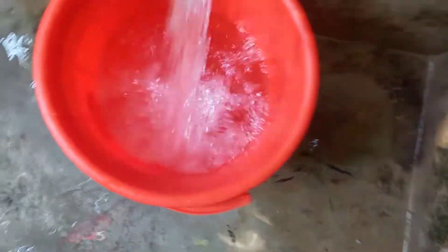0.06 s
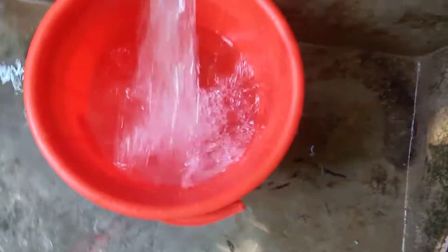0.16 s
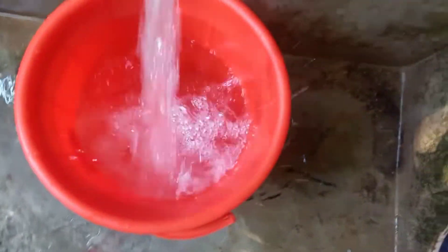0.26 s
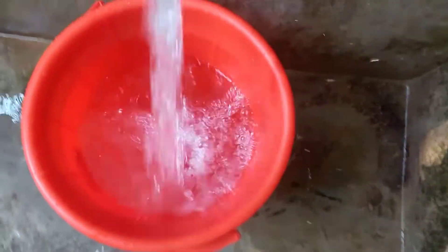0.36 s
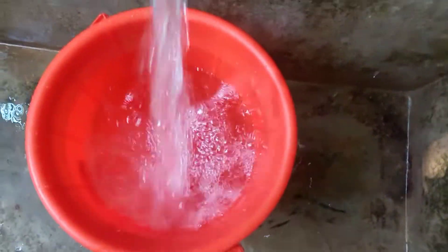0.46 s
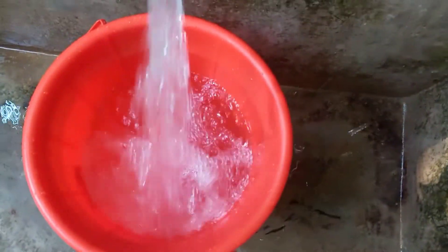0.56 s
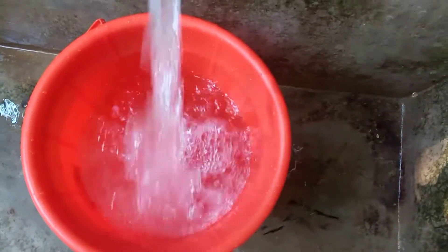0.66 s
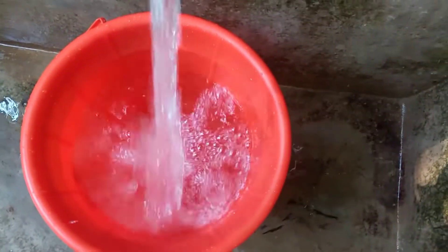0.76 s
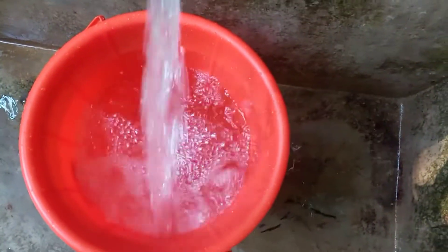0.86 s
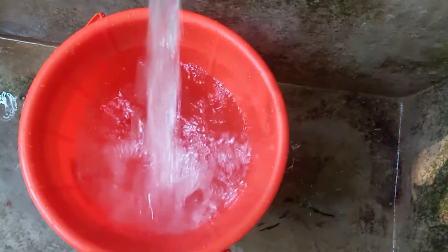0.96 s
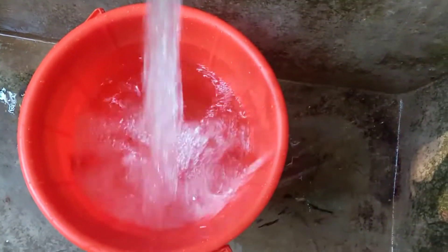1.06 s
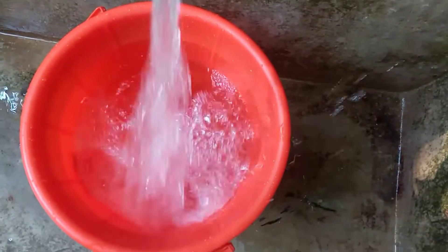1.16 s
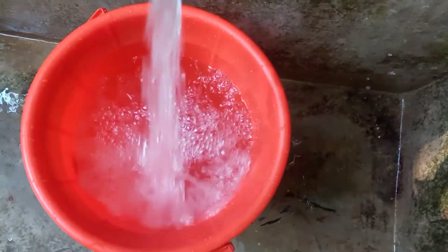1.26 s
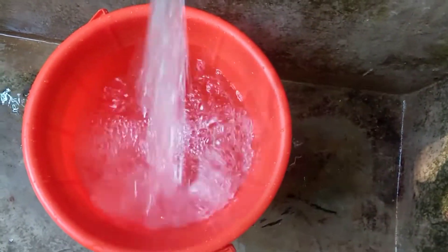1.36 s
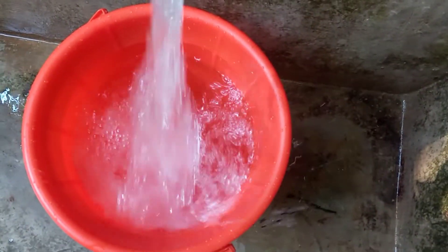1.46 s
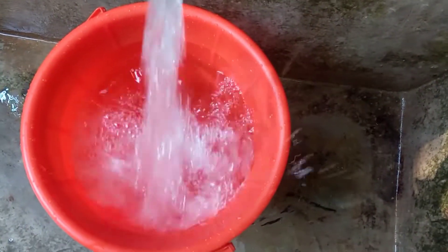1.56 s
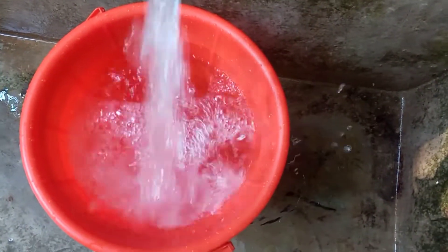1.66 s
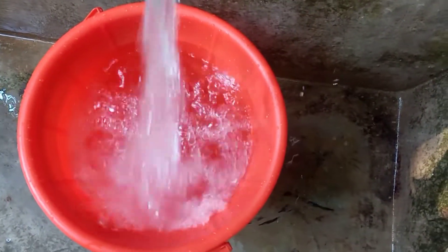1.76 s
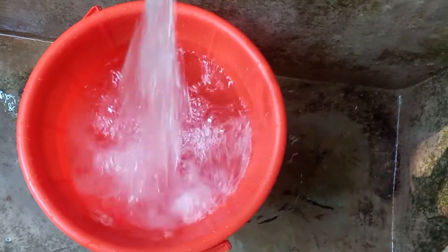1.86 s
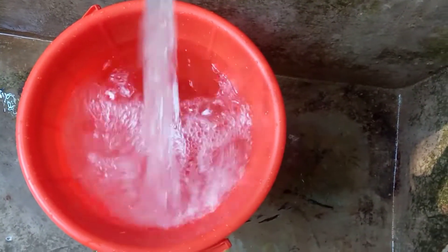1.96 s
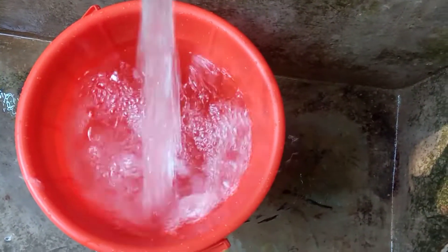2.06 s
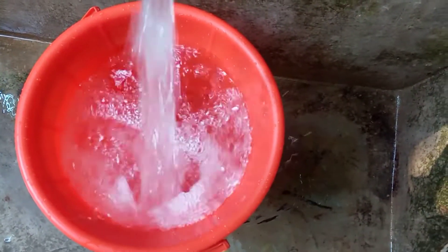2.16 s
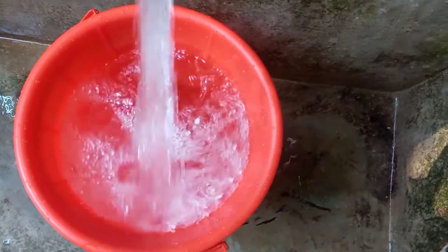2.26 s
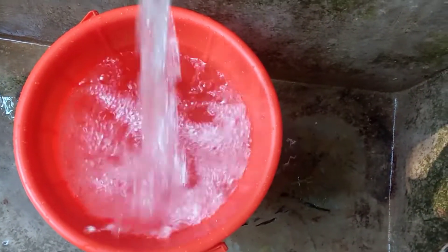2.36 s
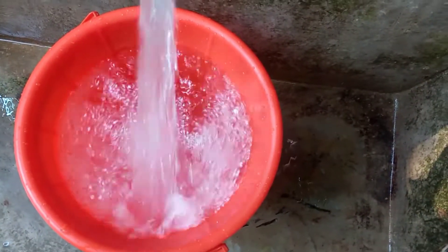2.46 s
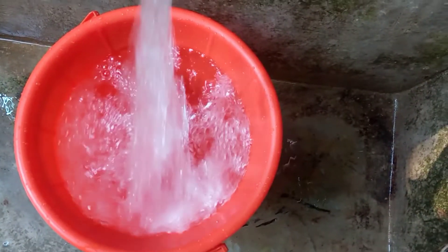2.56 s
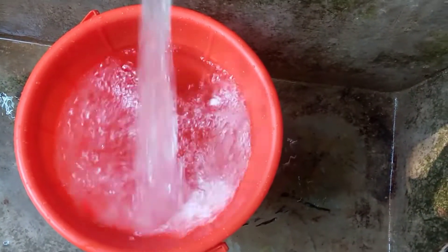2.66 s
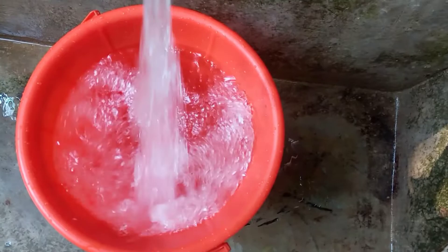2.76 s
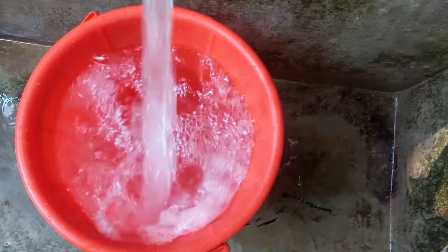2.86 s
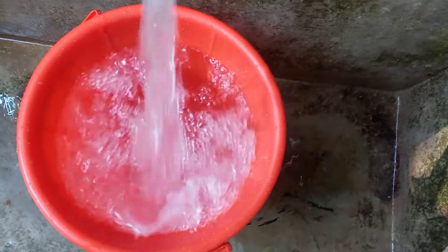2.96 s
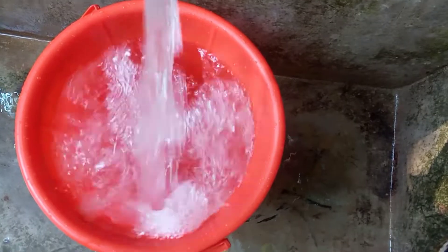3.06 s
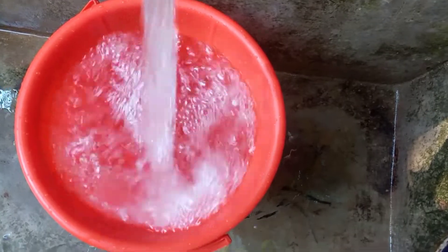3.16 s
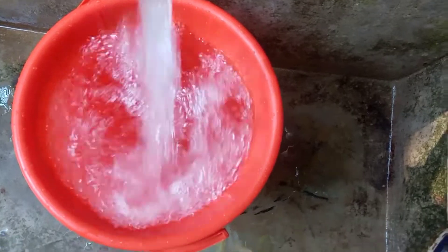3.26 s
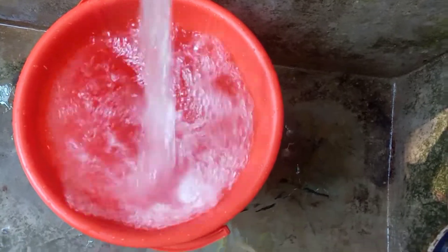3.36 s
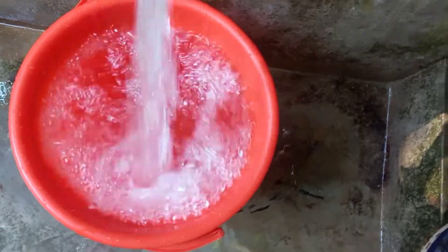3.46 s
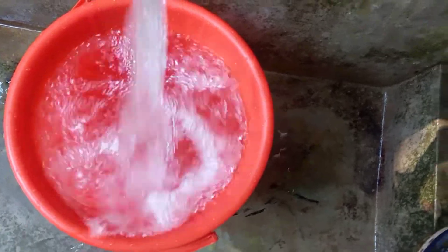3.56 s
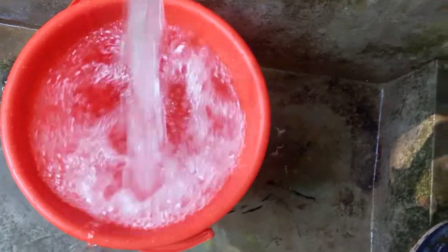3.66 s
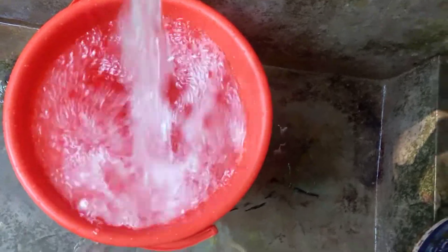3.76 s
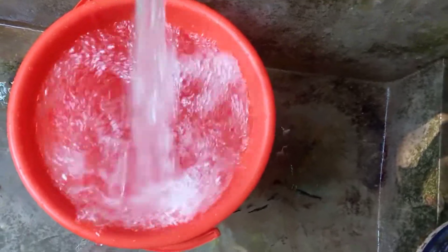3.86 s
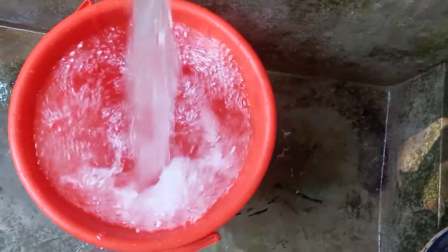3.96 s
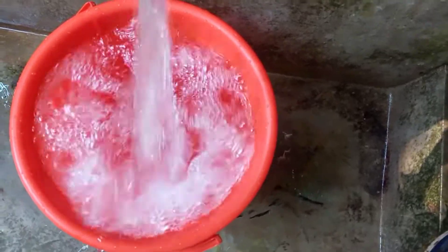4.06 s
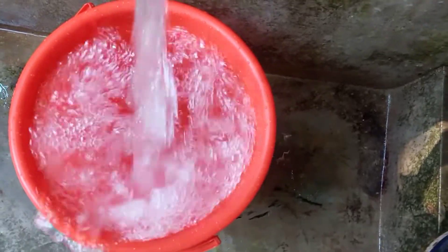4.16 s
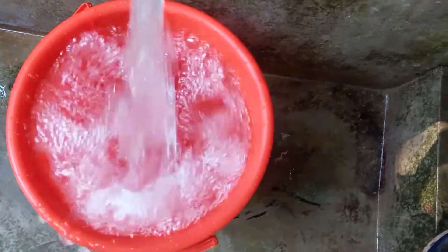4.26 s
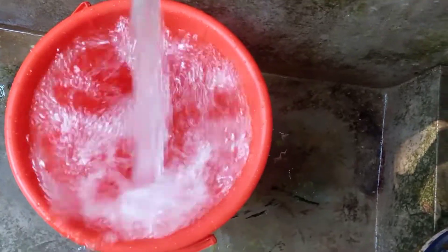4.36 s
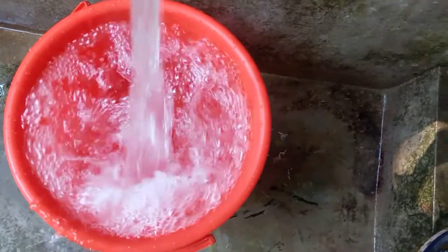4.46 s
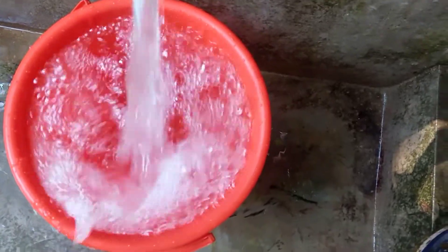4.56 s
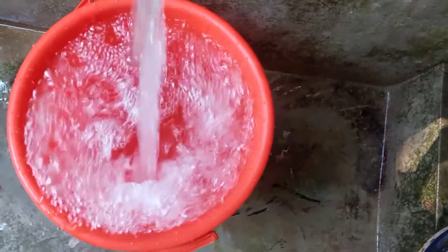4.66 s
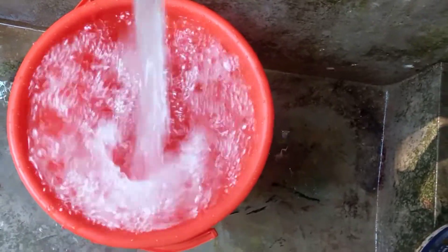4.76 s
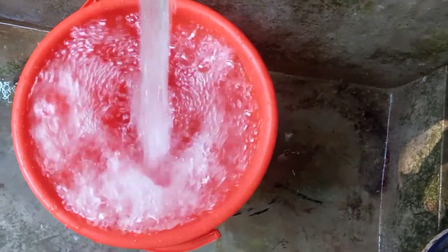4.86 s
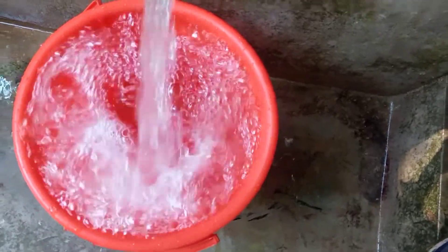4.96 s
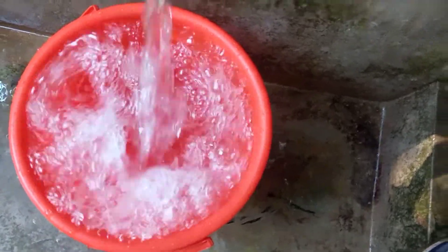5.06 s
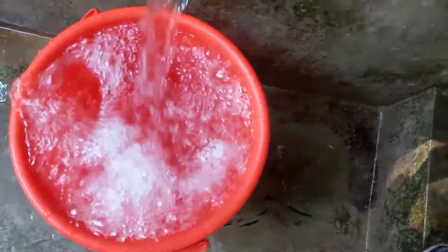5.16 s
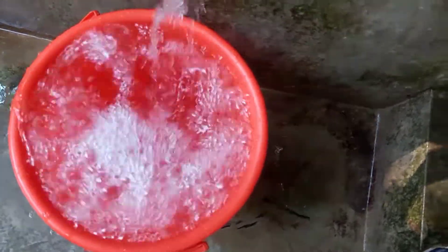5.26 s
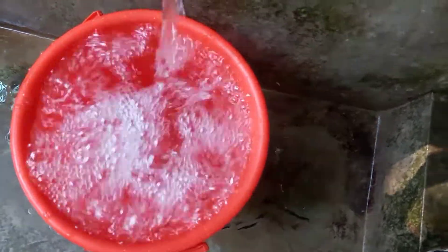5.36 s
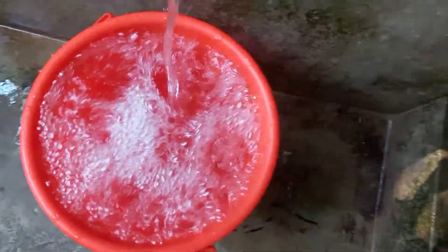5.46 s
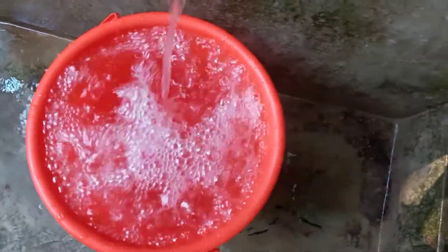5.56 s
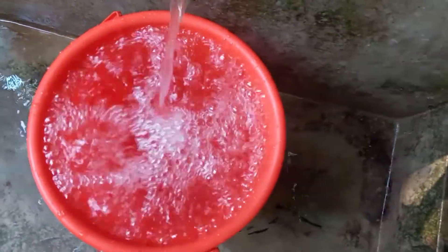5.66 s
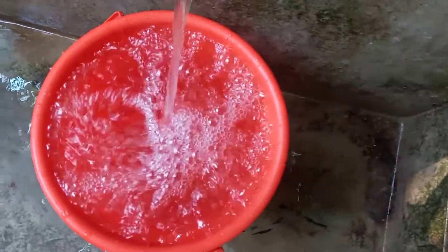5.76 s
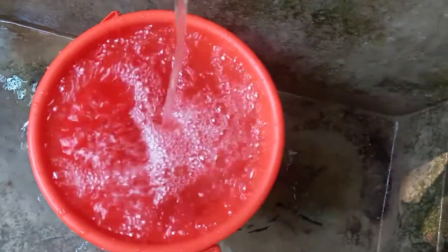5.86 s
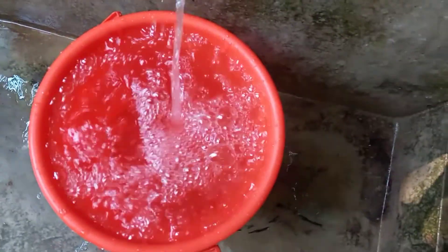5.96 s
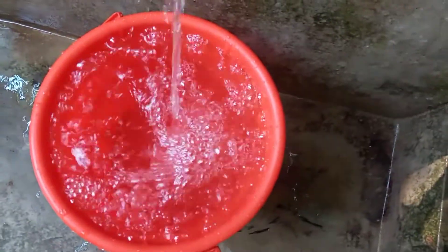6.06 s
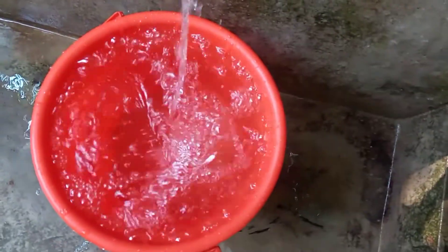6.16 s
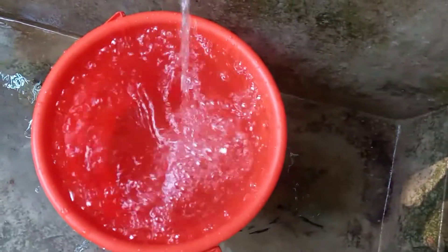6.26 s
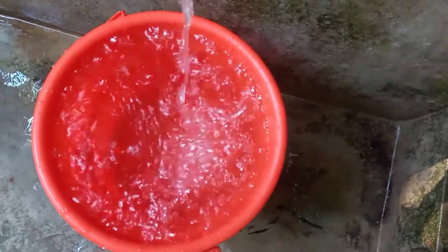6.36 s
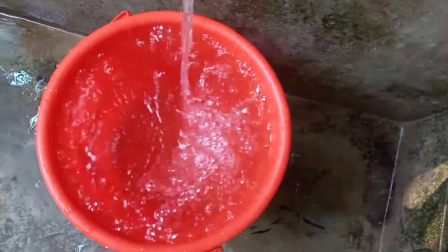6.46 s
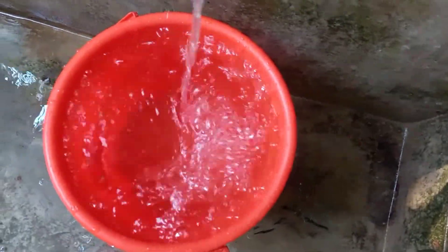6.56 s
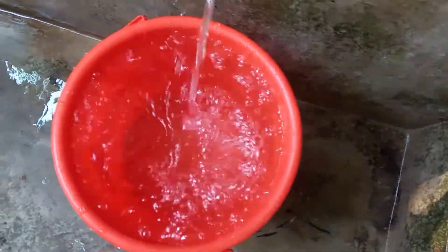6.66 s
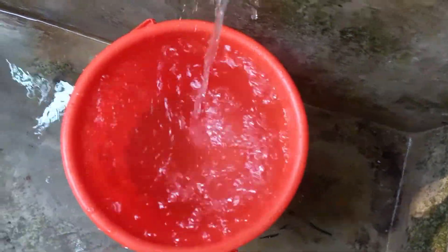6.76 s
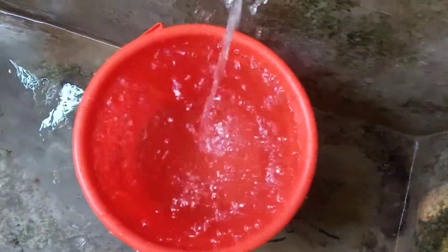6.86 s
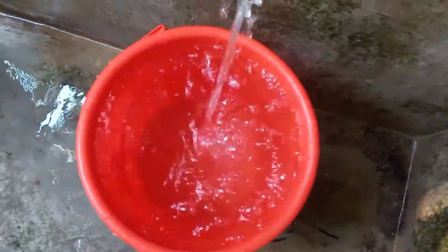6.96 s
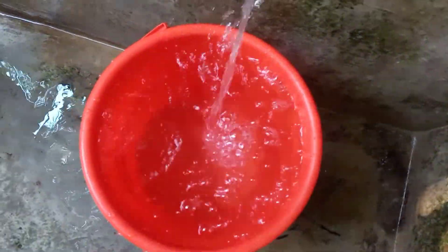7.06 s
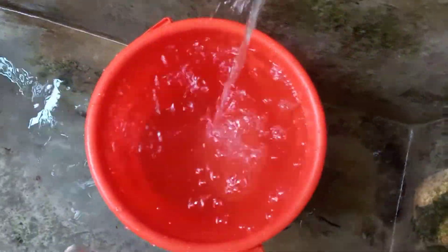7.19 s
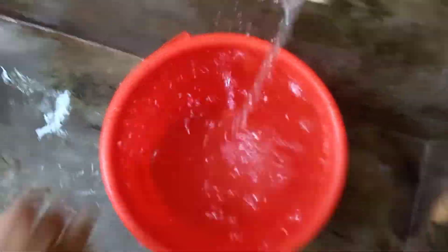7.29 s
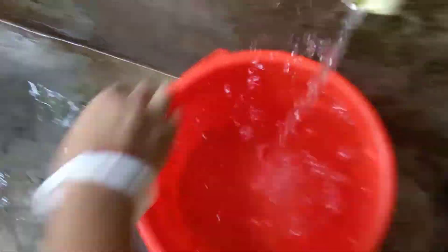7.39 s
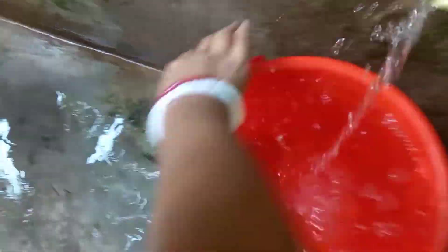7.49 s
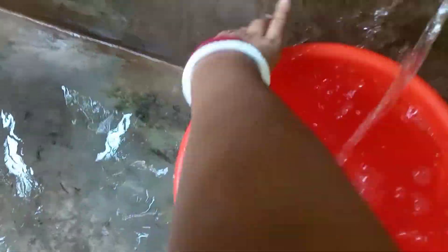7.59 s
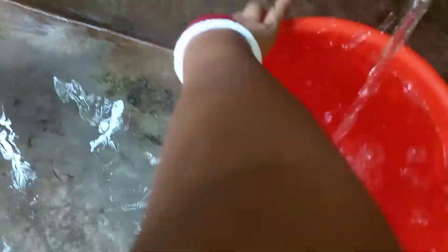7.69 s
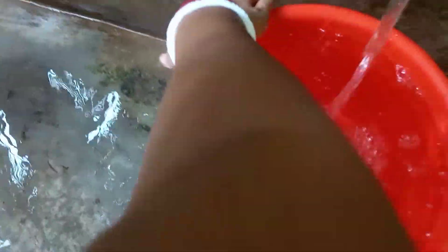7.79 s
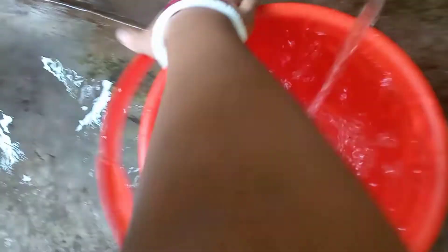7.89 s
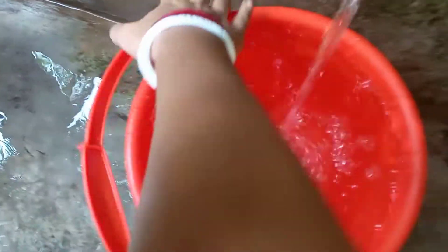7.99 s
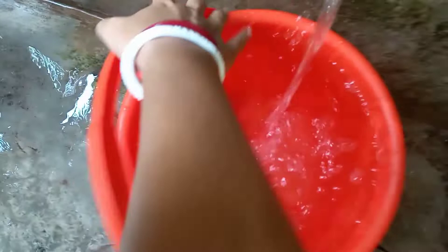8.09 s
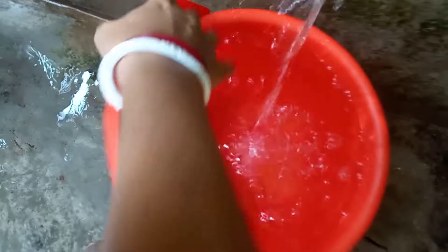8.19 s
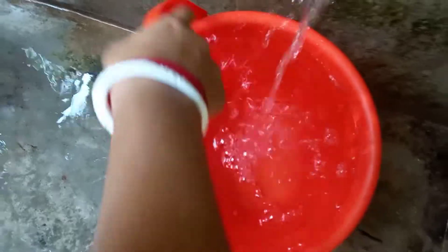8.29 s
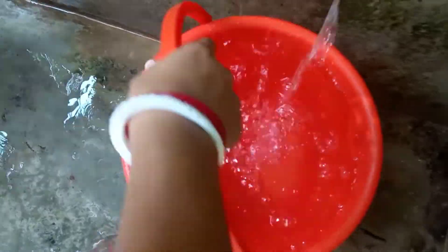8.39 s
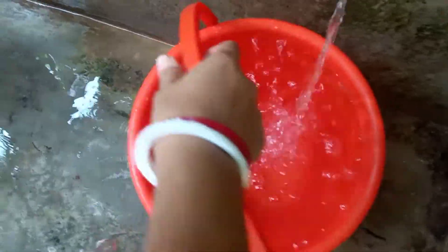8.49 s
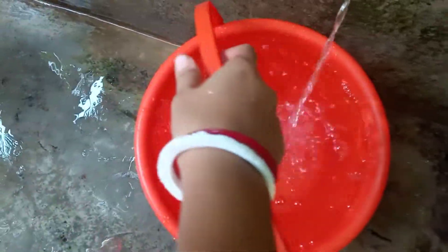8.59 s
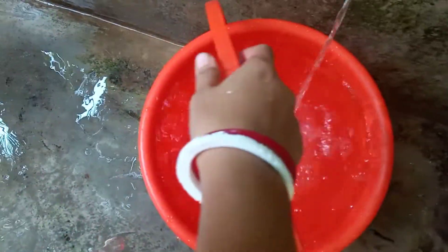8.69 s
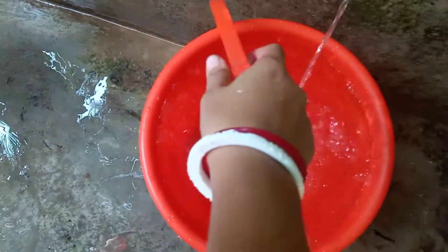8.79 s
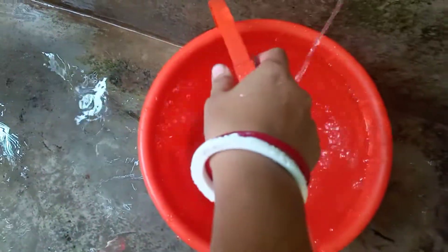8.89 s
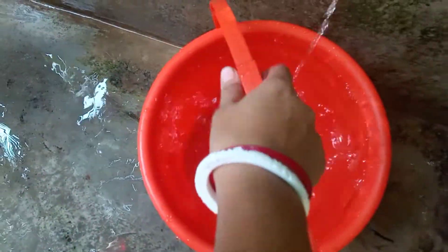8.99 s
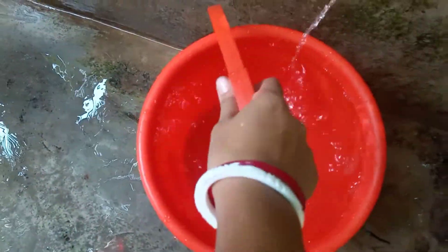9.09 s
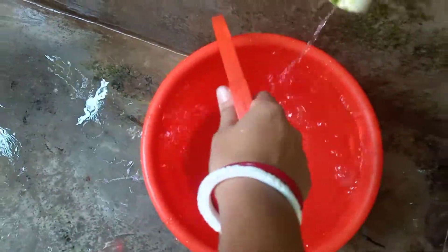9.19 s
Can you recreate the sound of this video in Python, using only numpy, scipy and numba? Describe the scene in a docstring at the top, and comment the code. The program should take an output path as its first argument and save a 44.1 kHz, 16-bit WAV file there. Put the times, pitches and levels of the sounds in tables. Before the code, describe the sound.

From the very start a thick stream pours into a plastic bucket, a loud, dense, bubbling rush with bright hissing spray and foam. It swells within the first second, then holds fairly steady but lumpy until about 5 s, its hollow bubbling tone shifting as the bucket fills, with occasional crisp splashes and ringing bubbles. Between 5.0 and 5.5 s the flow drops away fast, with a small flurry of gulps and drops. From 6 s a much quieter, uneven trickle plinks and gurgles: mid-pitched bubbles, sharp little ticks, soft hollow thuds on the bucket wall. Around 8.1 s, and again from 8.85 s, faint low bumps come from a hand shifting the bucket; the wall's ring rises in pitch and the trickle thins further to the end at about 9.2 s. Close microphone, short hard yard reflections, faint hiss, rumble and hum underneath.

```python
"""A thick stream from a spout plunges into a plastic bucket in a walled yard, then thins to a trickle.
The stream is swarms of dying, rising sines (bubbles, churn, droplets, mist) plus foam hiss.
Single drops smack as short hiss bursts; bubbles and gulps ring alone; thuds excite the bucket wall.
A hand on the bucket adds dull bumps. Dense echoes, faint hiss, rumble and a low hum lie beneath.
The microphone colour peaks near 7.8 kHz, and its gain falls as the sound grows loud."""
import sys
import numpy as np
from scipy import signal
from scipy.io import wavfile
from scipy.ndimage import uniform_filter1d
from numba import njit

SR = 44100
rng = np.random.default_rng(int(sys.argv[2]) if len(sys.argv) > 2 else 0)


def persist_wave(psi):
    """Save psi, clipped to +-1, as 16-bit WAV."""
    counts = np.round(np.clip(psi, -1, 1) * 32767).astype(np.int16)
    wavfile.write(sys.argv[1], SR, np.atleast_2d(counts).T)


N = 407043
T = np.arange(N) / SR

# stream levels; treble and churn relative to bubbles: start_s, bubbles_db, treble_db, churn_db
FLOW = [(0, -29.5, 3.5, -7.5), (0.75, -25, 1.5, -10.5), (1.6, -26, 2.5, -9), (2.1, -24.5, 0.5, -11.5),
        (3.3, -25.5, 0, -12), (4.6, -26.5, 1, -13), (4.95, -23.5, 0, -14.5), (5.15, -31, 1.5, -10.5),
        (5.3, -37.5, 1, -22), (5.45, -41.5, 6.5, -15), (5.65, -43, 1, -8), (5.9, -47, 5.5, -12.5),
        (6.1, -45, 3.5, -2), (6.45, -43.5, 7, -3), (6.8, -46.5, 3.5, -9), (7.2, -43.5, 5, -13.5),
        (7.9, -45, -2, -6), (8.4, -46, 7.5, -7), (8.85, -50, 5, -1.5), (9.23, -58.5, 10.5, 8)]
# gush thins to trickle: start_s, end_s
SHUT_S = (5.05, 5.3)
# arm reaches across; descending pair, so the spray colour steps at the second time: time_s, time_s
ARM_S = (6.96, 6.88)
# bubble colour from the bucket's air, gush into a nearly empty bucket: freq_hz, level_db
GUSH_EMPTY = [(600, -12.5), (850, -22.5), (1100, -2), (1450, 1.5), (1900, -2), (2400, 8), (3000, -11.5),
              (3500, 3.5), (4500, -9)]
# same, gush into a nearly full bucket: freq_hz, level_db
GUSH_FULL = [(600, -14.5), (850, -11), (1100, -3.5), (1450, 4.5), (1900, -3), (2400, 2), (3000, -7),
             (3500, -1.5), (4500, -12.5)]
# same, trickle: freq_hz, level_db
TRICKLE = [(600, -6), (1000, -10), (1350, -13), (1700, 3.5), (2050, 7.5), (2600, 1), (3300, -6.5),
           (4500, 3)]
# level of churn bubbles by pitch: pitch_hz, level_db
CHURN = [(90, -35), (150, -11), (250, -5.5), (340, -0.5), (430, 4), (600, 0), (850, 1.5), (1200, 17.5)]
# level of droplets by pitch, also foam colour: pitch_hz, level_db
SPRAY = [(2500, -8), (4000, -10.5), (6000, 1), (9000, 5), (11000, -22)]
# drops smacking the surface, levels relative: start_s, level_db, centre_hz
SMACKS = [(0.073, -3.5, 7730), (0.087, -6, 8000), (0.3075, -10, 8100), (0.784, -2.5, 7640),
          (0.92, -13, 8050), (2.798, -15, 8000), (3.844, -4, 7880), (4.974, -13, 7600), (5.145, -8, 7430),
          (5.192, -18, 7550), (5.272, -14, 7800), (5.3517, -20, 8740), (5.395, -13, 7750),
          (5.407, -16.5, 6400), (5.533, -13.5, 6930), (5.7054, -23.5, 7780), (5.853, -21, 7940),
          (5.875, -28, 7500), (6.011, -14.5, 7800), (6.2639, -19.5, 3050), (6.2908, -12, 7750),
          (6.355, -13, 7750), (6.403, -15, 7800), (6.43, -15, 7950), (6.461, -21, 8400),
          (6.4953, -25, 7390), (6.608, -20.5, 8400), (6.635, -30, 7700), (6.681, -14, 7800),
          (6.7141, -17.5, 7700), (6.9615, -27, 6230), (6.997, -25, 7300), (7.0166, -22, 7500),
          (7.055, -20, 7750), (7.0959, -26, 7240), (7.157, -20, 7040), (7.214, -18.5, 7800),
          (7.373, -22, 7500), (7.493, -20.5, 7400), (7.554, -23, 7400), (7.56, -18, 5240),
          (7.635, -19, 7470), (7.739, -30.5, 5170), (7.9795, -21.5, 7500), (8.271, -20.5, 6100),
          (8.344, -17, 5800), (8.455, -20.5, 7900), (8.506, -24, 7800), (8.711, -24, 8060),
          (8.829, -25.5, 8260), (9.038, -23.5, 4550), (9.082, -26.5, 5240), (9.132, -21, 7460)]
# single large bubbles, levels relative: start_s, level_db, start_pitch_hz
BUBBLES = [(0.164, -19, 2120), (0.1823, -9.5, 2200), (0.92, -17, 1560), (1.401, -19, 1270),
           (2.039, -24, 1090), (2.051, -7, 1080), (2.084, -9, 1295), (2.2918, -10, 1315),
           (2.346, -9.5, 2130), (2.798, -11.5, 1260), (3.039, -20, 1500), (4.073, -13, 1710),
           (4.176, -8, 1320), (5.026, -10.5, 1286), (5.151, -18, 1980), (5.157, -16.5, 1550),
           (5.2477, -15.5, 1680), (5.285, -23, 2110), (5.351, -19, 1010), (5.351, -19, 2270),
           (5.497, -20, 2480), (5.519, -15, 2330), (5.563, -24.5, 2260), (5.628, -31, 2180),
           (6.076, -26.5, 1776), (6.156, -30, 780), (6.199, -23, 3120), (6.264, -29, 986),
           (6.2642, -15.5, 2480), (6.321, -14.5, 3280), (6.427, -16.5, 1900), (6.527, -19, 1970),
           (6.531, -16.5, 1840), (6.54, -15, 1920), (6.5734, -21.5, 2160), (6.648, -23, 1940),
           (6.7515, -27, 1860), (6.8259, -33, 770), (6.956, -25, 1980), (7.006, -23.5, 2250),
           (7.0183, -22, 2140), (7.363, -21.5, 2400), (7.47, -25, 2320), (7.492, -24.5, 1840),
           (7.5431, -18.5, 2210), (7.675, -22.5, 2180), (7.9002, -24, 2160), (7.998, -25.5, 1820),
           (8.058, -25.5, 1960), (8.21, -29.5, 2240), (8.259, -25, 2100), (8.343, -20, 2190),
           (8.3441, -23, 880), (8.4384, -20, 1820), (8.4498, -17.5, 2340), (8.461, -20, 1980),
           (8.4675, -16, 2080), (8.7115, -27, 1900), (8.7634, -24.5, 2500), (8.891, -27.5, 2540),
           (8.904, -26, 1990), (8.986, -25, 3030)]
# air pockets gulping shut near the surface: start_s, level_db, start_pitch_hz, climb_share_per_s
GULPS = [(5.184, -32, 297, -1), (5.312, -40, 963, -9), (5.395, -29.5, 546, 12), (5.411, -32, 955, 14),
         (5.4266, -35, 577, 12), (5.452, -34.5, 970, 7), (5.465, -35, 710, 11), (5.4962, -33, 548, 9),
         (5.503, -29, 766, 8), (5.573, -34, 430, 4), (8.3438, -33, 628, 6), (8.7795, -29, 498, 15),
         (8.8289, -33.5, 673, 19.5), (8.874, -38, 660, 5.5), (9.078, -42, 760, 3)]
# trickle clumps thudding on the full bucket, levels relative: start_s, level_db
THUDS = [(6.061, -28), (6.115, -35), (6.538, -30), (6.772, -32.5), (7.282, -35), (7.374, -33.5),
         (7.551, -41), (7.604, -28.5), (7.692, -33), (7.763, -35), (7.9, -31), (7.95, -38), (8.065, -37.5),
         (8.611, -43), (8.712, -34.5), (8.901, -34), (9.147, -46)]
# lowest ring of the bucket wall: time_s, pitch_hz
WALL_PITCH = [(5.4, 437), (6.55, 447), (6.8, 386), (7.4, 352), (7.75, 336), (8.3, 373), (8.65, 486),
              (8.92, 602), (9.23, 616)]
# handling bumps, levels before swell and x4 gain: start_s, level_db, pitch_hz, t60_s
BUMPS = [(8.131, -41, 99, 0.16), (8.135, -43, 45, 0.14), (8.85, -51, 59.2, 0.5), (8.93, -44, 58.3, 0.36),
         (9.14, -48, 72, 0.28)]
# outdoor rumble colour: freq_hz, level_db
YARD = [(24, -48), (40, -3), (102, 5.5), (177, -10), (372, -11), (511, -20), (1500, -8), (1950, -40),
        (3300, -120)]
# microphone colour: freq_hz, level_db
MIC = [(40, -9.5), (70, -1.5), (3000, -0.5), (4670, -12), (6300, -6), (7760, 3.5), (8700, -6),
       (9800, -12.5), (11500, -11), (15000, -2.5)]

MIST_DB, ARM_SHADE_DB = -4.5, -1.5  # mist relative to spray; further change behind the arm
GAP_PEAK_S, GAP_DB = 0.012, -2  # dip before a landing, deepest this long ahead
SURGE_DECAY_S, SURGE_DB = 0.0054, 7.5  # splash after a landing, before onset and flow scaling
SLAP_DB, HEAVY_SLAP_DB = -17, 6  # relative to the drop; heavy = centre up to 4 kHz
YARD_DB, HUM_HZ, HUM_DB, HISS_DB = -57, 98.7, -62, -79
EDGE_HZ = 15620


def stream():
    """Clumps of water land unevenly and drive bubbles, churn, spray and mist together."""
    s, *levels = np.transpose(FLOW)
    bubbles_db, treble_db, bass_db = (np.interp(T, s, level) for level in levels)
    churn_db = bubbles_db + bass_db
    spray_db = bubbles_db + treble_db
    mist_db = spray_db + MIST_DB + np.interp(T, ARM_S, [0, ARM_SHADE_DB])
    gush = np.interp(T, SHUT_S, [1, 0])
    trickle = 1 - gush

    lumpy_db = (2.1 + 1.2 * trickle) * wander(17.0) + (2.78 + 2.0 * trickle) * wander(40)
    spatter_db = 0.5 * lumpy_db + 2.37 * wander(28)  # spray partly flies at its own moments

    water = gain_of(bubbles_db) * stream_bubbles(gush, lumpy_db)
    water += gain_of(churn_db) * churn(gush, lumpy_db)
    water += gain_of(spray_db) * spray(gush, spatter_db)
    water += gain_of(mist_db) * mist(gush, spatter_db)
    return gain_of((1 - 0.28 * gush) * landings_db()) * water


def stream_bubbles(gush, lumpy_db):
    """Trapped bubbles ring through the bucket's air, whose colour shifts as the bucket fills."""
    surge_db = 0.7 * wander(4.5)  # broader surges of the pour
    filled = np.clip(T / SHUT_S[0], 0, 1)

    def level_db(at, hz):
        return 0.76 * lumpy_db[at] + surge_db[at]

    mid = swarm(683.4, 4380, .45 + .55 * gush, 37.8, 1.13, 3.53, level_db, count=34000)
    empty = coloured(mid * gush * (1 - filled), GUSH_EMPTY)
    full = coloured(mid * gush * filled, GUSH_FULL)
    return steady(empty + full + coloured(mid * (1 - gush), TRICKLE))


def churn(gush, lumpy_db):
    """Large low bubbles, plus the wall ringing at random knocks of the trickle."""
    def level_db(at, hz):
        deeper = 1.14 * gush[at] * (T[at] - 2.5) * np.log(400 / hz)  # deep water forms bigger bubbles
        tilt = 0.8 * (1 - gush[at]) * np.log(hz / 300)
        return read(CHURN, hz) + deeper - tilt + 0.59 * lumpy_db[at]

    low = swarm(109.3, 1144, .4 + 1.05 * gush, 19.0, 0.56, 1.38, level_db, count=7000)
    hits = rng.random(N) < 90 / SR
    knocks = rng.standard_normal(N) * hits * (1 - gush) * gain_of(0.5 * lumpy_db)
    return steady(steady(low) + 0.38 * evened(bucket_wall(knocks)))


def spray(gush, spatter_db):
    """Droplets ring as tiny bubbles; foam fizzes finely under them as coloured noise."""
    drift = wander(1.6)  # slides the boosted band

    def level_db(at, hz):
        centre_hz = 5500 + 500 * drift[at]
        band = np.exp(-(np.log(hz / centre_hz) / 0.061) ** 2)
        brighter = np.interp(T[at], ARM_S, [0, 15]) * band
        lower = np.interp(T[at], ARM_S, [0, 5.0]) * (hz < 4300)
        return read(SPRAY, hz) + brighter + lower + 1.08 * spatter_db[at]

    droplets = swarm(2410, 10940, .3 + 0.66 * gush, 30.0, 2.1, 3.2, level_db, count=44000)
    foam = coloured(rng.standard_normal(N), [(500, -19)] + SPRAY + [(15000, -37)])
    fizz = evened(foam) * gain_of(0.9 * spatter_db)
    return steady(steady(droplets) + (0.33 - 0.17 * (1 - gush)) * fizz)


def mist(gush, spatter_db):
    """The finest droplets ring above 9.5 kHz."""
    def level_db(at, hz):
        return 1.35 * spatter_db[at]

    return steady(swarm(9500, 16000, .3 + .7 * gush, 22, 3.5, 3.8, level_db, count=36000))


def landings_db():
    """The broken stream pauses before each big drop, then surges briefly."""
    marks, t = np.zeros(N), np.arange(-4000, 4001) / SR
    starts_s = np.array([row[0] for row in SMACKS + BUBBLES + GULPS + THUDS])
    marks[(starts_s * SR).astype(np.int64)] = 1
    gap = GAP_DB * np.sin(np.pi * np.clip(-t / GAP_PEAK_S / 2, 0, 1)) ** 0.84
    surge = SURGE_DB * np.exp(-t / SURGE_DECAY_S) * np.minimum(t / 0.0014, 1)
    shape = np.where(t < 0, gap, surge)
    return np.clip(signal.oaconvolve(marks, shape, "same"), GAP_DB, 1.2 * SURGE_DB)


def swarm(low_hz, high_hz, share, cycles, soft, spread_db, weight_db, count):
    """Bubbles of random pitch, length and size; a small share thins them and lets them glide further."""
    draws = rng.random((count, 6))
    kept = draws[:, 1] < share[(draws[:, 0] * N).astype(np.int64)]
    when, _, pitch, length, glide, luck = draws[kept].T
    at = (when * N).astype(np.int64)
    hz = low_hz * (high_hz / low_hz) ** pitch
    t60 = cycles * (.5 + length) / hz
    rise = 0.309 * glide / share[at] ** 0.62
    rarity = np.log(np.maximum(luck, .05 - 0.0276 * share[at]))  # a few are large
    size = gain_of(weight_db(at, hz) - spread_db * rarity) / np.sqrt(share[at])
    return ring(at, hz, t60, rise, size, soft)


@njit
def ring(start, hz, t60, rise, size, soft):
    """Sums bubbles: dying sines that swell over soft cycles and glide in pitch near the surface."""
    out = np.zeros(N)
    for k in range(len(start)):
        state = size[k] + 0j
        step = np.exp((2j * np.pi * hz[k] - 6.9 / t60[k]) / SR)
        bend = np.exp(4j * np.pi * hz[k] * rise[k] / t60[k] / SR ** 2)
        quiet, opening = 1., np.exp(-hz[k] / soft / SR)
        for i in range(start[k], min(start[k] + int(.8 * t60[k] * SR), N)):
            out[i] += state.imag * (1 - quiet)
            state *= step
            step *= bend
            quiet *= opening
    return out


def smacks():
    """A snap of hiss with a brief ring at the drop's centre frequency (near 7.8 kHz for most), a tick and a
    dull slap."""
    out, t = np.zeros(N), T[:700]
    slap_band = signal.butter(2, [900, 3600], "band", fs=SR)
    fade = np.exp(-t / 0.0021) * (1 - np.exp(-t / 0.00093))
    for (s, db, hz), hiss in zip(SMACKS, rng.standard_normal((len(SMACKS), 2, 700))):
        snap_band = signal.butter(1, [0.87 * hz, 1.1 * hz], "band", fs=SR)
        snap = evened(signal.lfilter(*snap_band, hiss[0])) * fade
        add(out, s, gain_of(db - read(MIC, hz) - 3.0) * snap)  # offsets microphone colour
        tick = np.diff(hiss[0], prepend=0) * fade ** 1.72 * 0.8
        add(out, s, gain_of(db + 5.5) * tick)
        impact = (t == 0) * 2.2 + hiss[1] * np.exp(-t / 0.0012)
        slap_db = SLAP_DB if hz > 4000 else HEAVY_SLAP_DB
        add(out, s, gain_of(db + slap_db) * signal.lfilter(*slap_band, impact) * 1.44)
    s, db, hz = np.transpose(SMACKS)
    same = np.ones(len(s))
    size = gain_of(db - read(MIC, hz) - 3.0)
    return out + ring((s * SR).astype(np.int64), hz, 0.0091 * same, 0.3 * same, size, 0.45)


def single_bubbles():
    """Large bubbles ring alone and rise in pitch; bigger ones ring longer."""
    s, db, hz = np.transpose(BUBBLES)
    t60 = 0.052 * (500 / hz) ** 0.596
    return ring((s * SR).astype(np.int64), hz, t60, 0.265 + 0 * hz, gain_of(db + 2.0), 1.8)


def gulps():
    """Closing air pockets ring abruptly with their own pitch glide."""
    s, db, hz, climb = np.transpose(GULPS)
    t60 = 0.11 * (500 / hz) ** 0.16
    return ring((s * SR).astype(np.int64), hz, t60, climb * t60 / 2, gain_of(db), 0.079)


def thuds():
    """Each clump gives a dull knock and sets the wall ringing."""
    s, db = np.transpose(THUDS)
    knocks = np.zeros(N)
    knocks[(s * SR).astype(np.int64)] = gain_of(db)
    knock = signal.lfilter(*signal.butter(2, [250, 1000], "band", fs=SR), knocks)
    return gain_of(-8) * bucket_wall(knocks) + gain_of(-1) * knock


def bucket_wall(knocks):
    """Three wall resonances; they sink as water loads the wall and rise when the handle pulls it."""
    turns, out = np.cumsum(np.interp(T, *np.transpose(WALL_PITCH))) / SR, 0
    for ratio, width_hz, db in ((1, 20.2, 1), (1.45, 28, -2.2), (2.05, 32, -1.4)):
        spin = np.exp(2j * np.pi * ratio * turns)
        keep = np.exp(-np.pi * width_hz / SR)
        out = out + gain_of(db) * (spin * signal.lfilter([1], [1, -keep], knocks / spin)).imag
    return out


def handling():
    """Dull bumps as the hand shifts the bucket: low sines that swell and die."""
    out = np.zeros(N)
    for s, db, hz, t60 in BUMPS:
        t = np.arange(0, t60, 1 / SR)
        envelope = gain_of(db - 60 * t / t60) * (1 - np.exp(-t / 0.034))
        add(out, s, envelope * np.sin(2 * np.pi * hz * t) * 4)
    return out


def yard_echoes(x):
    """Quick, dense echoes off floor and walls: one tap of random sign in every 20 samples."""
    at = np.arange(60, 6000, 20) + rng.integers(0, 20, 297)
    taps = np.zeros(6100)
    taps[at] = rng.choice([-1., 1.], len(at)) * gain_of(-60 * at / SR / 0.084)  # t60 0.084 s
    return signal.oaconvolve(x, taps / np.linalg.norm(taps))[:N]


def yard():
    """Faint hiss, low outdoor rumble and a hum wavering in level and phase."""
    rumble = evened(coloured(rng.standard_normal(N), YARD))
    a, b = uniform_filter1d(rng.standard_normal((2, N)), size=3000)
    phase = 2 * np.pi * HUM_HZ * T
    hum = (0.59 + evened(a)) * np.cos(phase) + evened(b) * np.sin(phase)
    hiss = rng.standard_normal(N)
    return gain_of(HISS_DB) * hiss + gain_of(YARD_DB) * rumble + gain_of(HUM_DB) * evened(hum)


def wander(top_hz):
    """Random bounded level swings that rise quicker than they sag, up to about top_hz a second."""
    rate = SR / 16
    t = np.arange(0, T[-1] + .01, 1 / rate)
    kicks = rng.exponential(1, len(t)) * (rng.random(len(t)) < 5 * top_hz / rate)
    smooth = uniform_filter1d(kicks, size=int(rate / top_hz / 3))
    x = signal.lfilter([1], [1, -np.exp(-2 * np.pi * top_hz / rate)], smooth)
    return np.interp(T, t, 2 * np.tanh(evened(x - x.mean()) / 2))


def gain_of(db):
    """Amplitude ratio of a level in dB."""
    return 10 ** (np.asarray(db) / 20)


def evened(x):
    """Scales to unit RMS."""
    return x / np.sqrt(np.mean(x ** 2) + 1e-20)


def steady(x):
    """Levels a sound to unit RMS over a third of a second."""
    return x / np.sqrt(abs(uniform_filter1d(x ** 2, size=15000)) + 1e-20)


def read(points, hz):
    """Reads a colour table in dB, interpolating over log frequency."""
    f, value = np.transpose(points)
    return np.interp(np.log(hz + 1), np.log(f + 1), value)


def add(mix, s, sound):
    """Adds a sound at s seconds, cut at the end of the mix."""
    part = mix[round(s * SR):][:len(sound)]
    part += sound[:len(part)]


def coloured(x, points):
    """Causal filter: the phase follows from the log gain."""
    log_gain = np.log(gain_of(read(points, abs(np.fft.fftfreq(8192, 1 / SR)))))
    taps = np.fft.ifft(np.exp(np.conj(signal.hilbert(log_gain)))).real[:4096]
    return signal.oaconvolve(x, taps)[:len(x)]


def scene():
    """Sums the water, its echoes, the handling and the yard."""
    water = stream() + smacks() + single_bubbles() + gulps() + thuds()
    return (water + gain_of(-13.0) * yard_echoes(water) + handling() + yard())[None]


def record(dry):
    """Microphone colour, slow gain control (0.2 dB down per dB over -38.5 dB), then the band limit."""
    heard = coloured(dry[0], MIC)
    power_db = 10 * np.log10(abs(uniform_filter1d(heard ** 2, size=20000)) + 1e-12)
    heard = heard * gain_of(1.0 - 0.2 * np.maximum(power_db + 38.5, 0))
    low_pass = signal.firwin(511, EDGE_HZ, window=("kaiser", 11), fs=SR)
    return signal.oaconvolve(heard, low_pass, "same")[None]


dry = scene()
out = record(dry)
persist_wave(out)
```